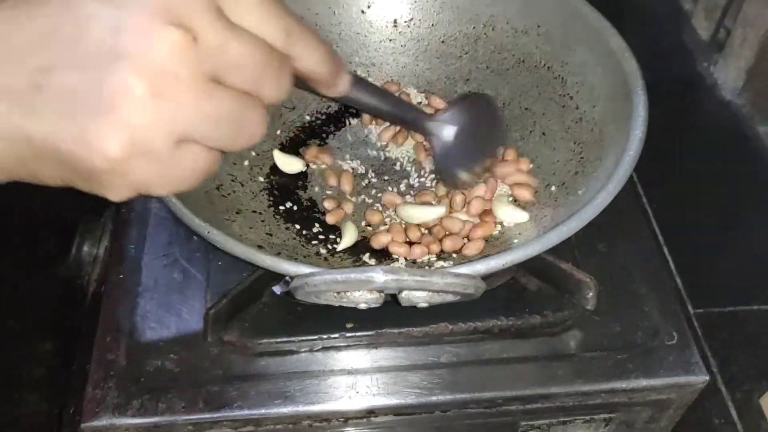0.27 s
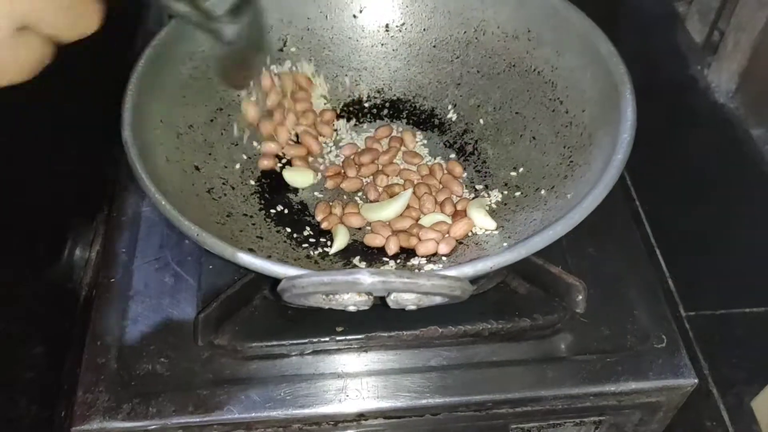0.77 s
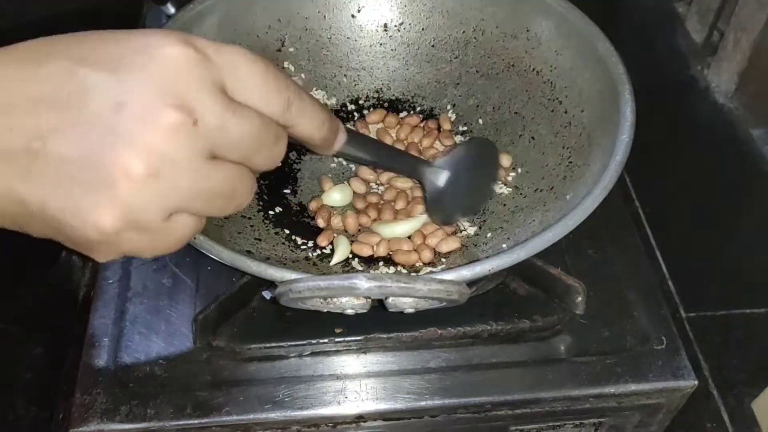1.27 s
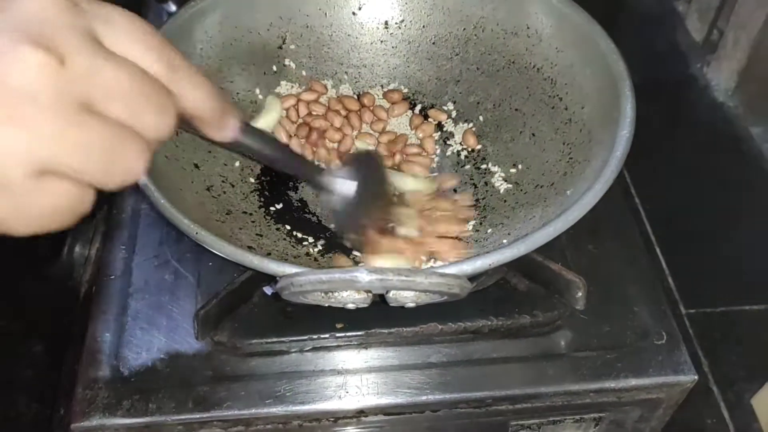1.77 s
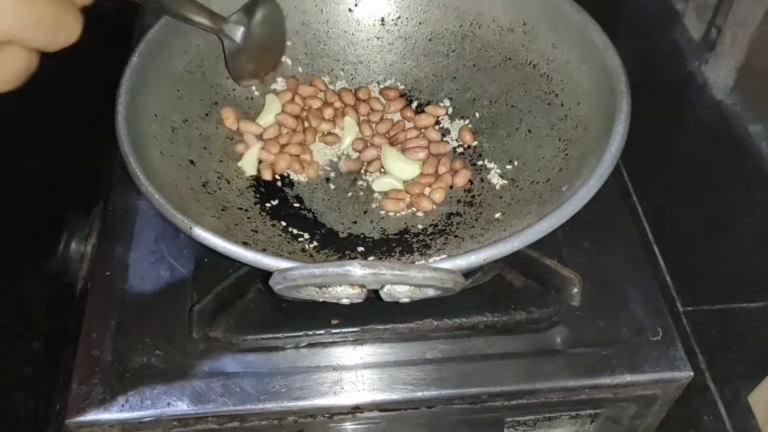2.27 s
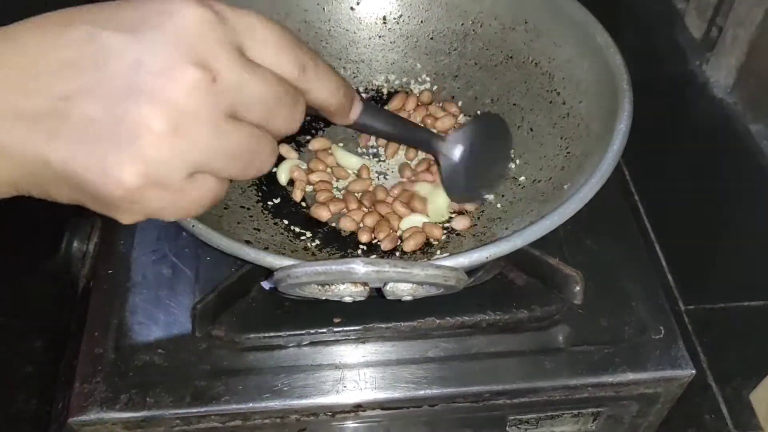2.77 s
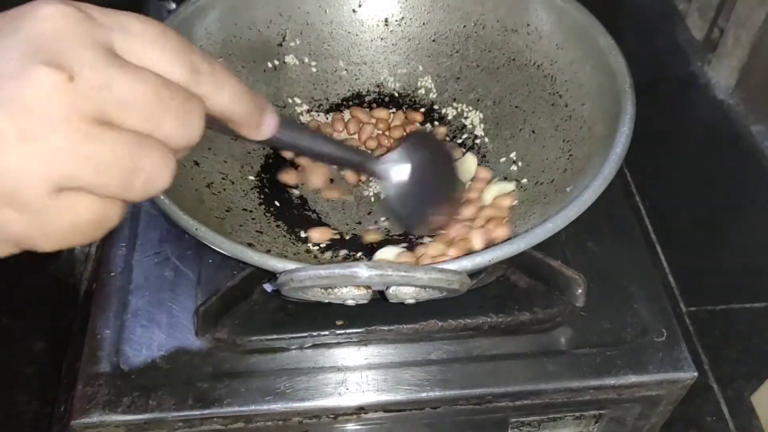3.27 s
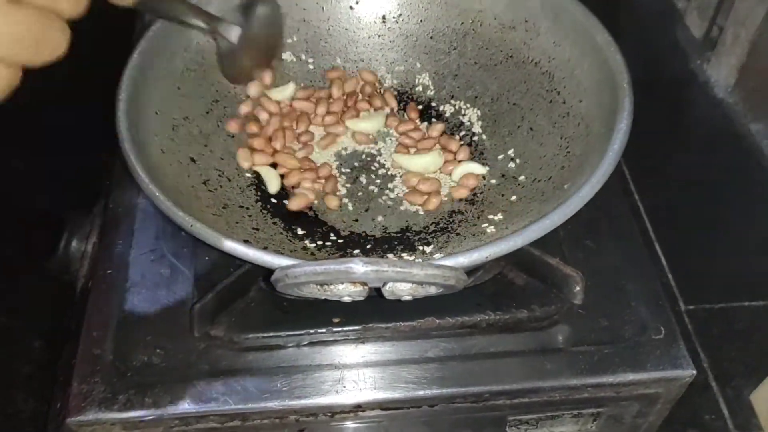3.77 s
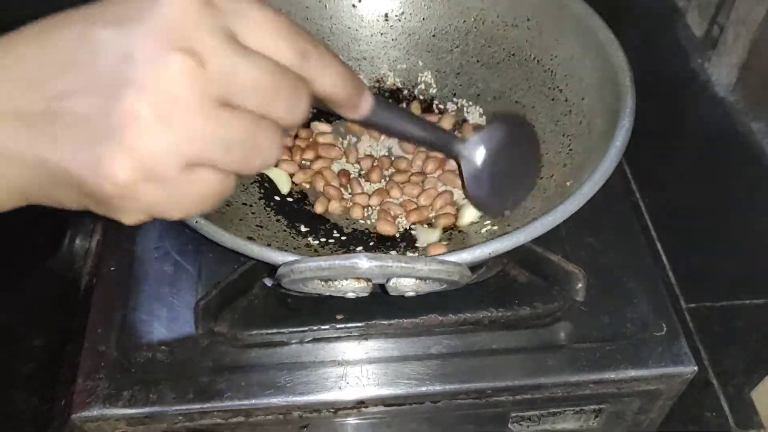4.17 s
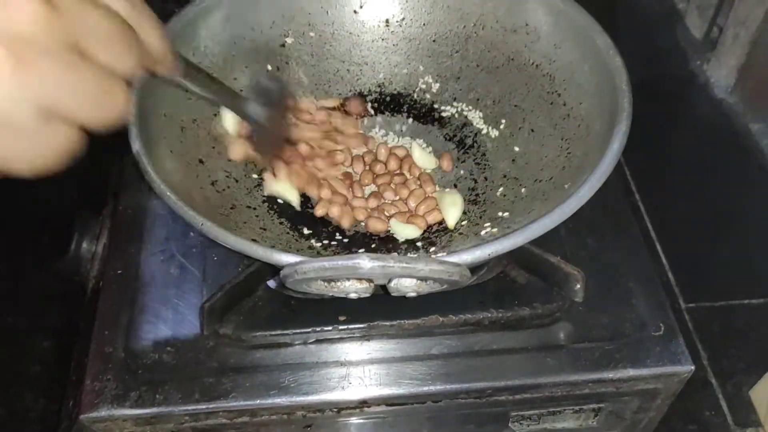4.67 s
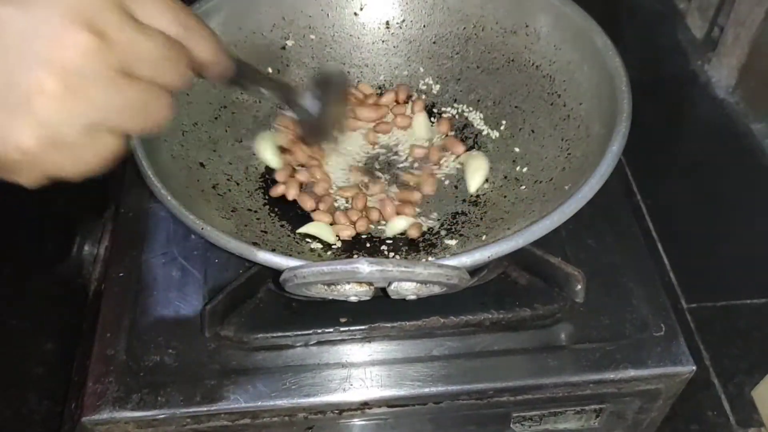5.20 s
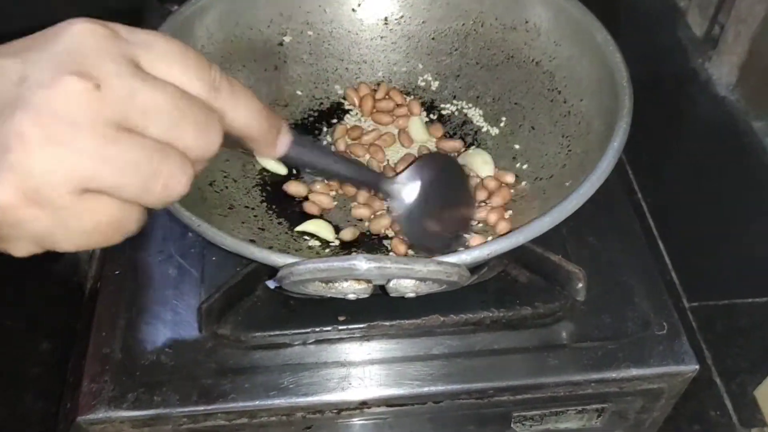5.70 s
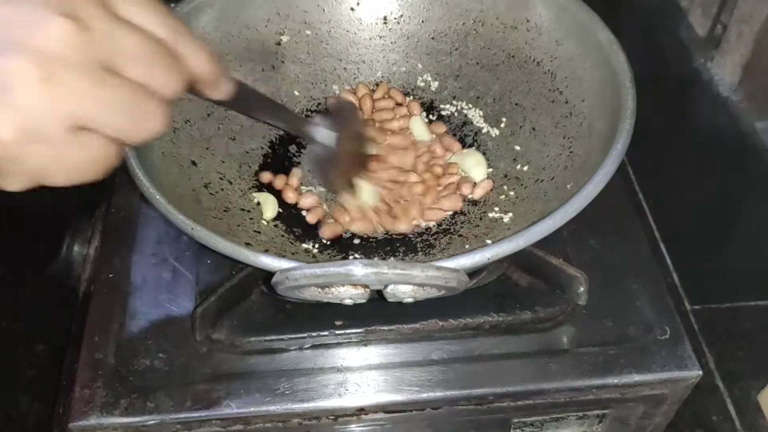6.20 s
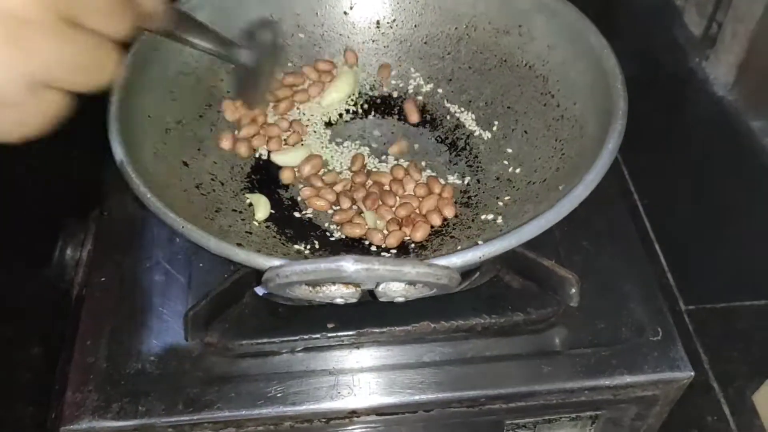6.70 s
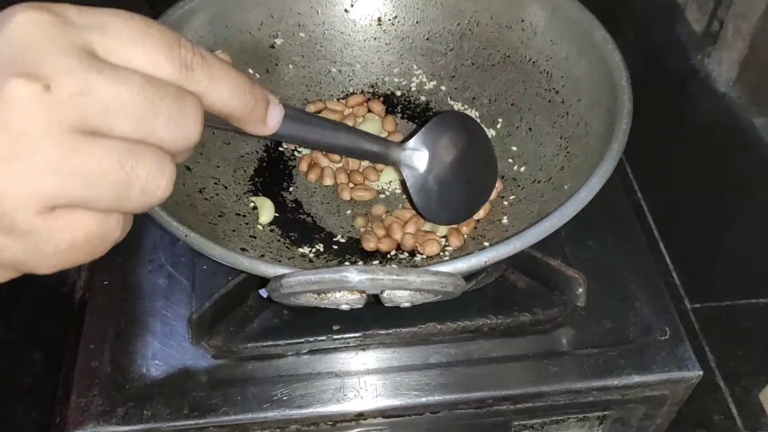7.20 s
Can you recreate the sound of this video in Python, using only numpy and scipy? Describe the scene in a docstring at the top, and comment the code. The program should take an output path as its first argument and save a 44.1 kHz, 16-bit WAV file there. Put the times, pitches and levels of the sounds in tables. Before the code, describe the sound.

Dry-roasting nuts are stirred briskly in a wide metal pan. The ladle edge lands with a hard, short clank, skids, pushes through crunchy food with a rasping swish, then lifts while loose pieces tumble. This repeats to the end, some blows loud enough to distort, others dull. Close stereo microphone, bright and slightly harsh, with hard room reflections, quiet burner hiss and faint low rumble.

```python
"""A steel ladle clanks onto a thin metal pan, close by, then drags through nuts, seeds and grit.
Landings and lighter knocks are short noise bursts ringing the modes of pan and ladle.
Pushes, skids and settling food are random clicks through those same modes, plus two moving resonances.
A hard kitchen answers with a tail of sparse taps; shaped noise makes the gas burner's hiss and the
house rumble, and two wavering sine tones hum underneath."""
import sys
import numpy as np
from scipy import signal
from scipy.io import wavfile
from scipy.ndimage import uniform_filter1d

SR = 44100
rng = np.random.default_rng(int(sys.argv[2]) if len(sys.argv) > 2 else 0)


def amp(db):
    return 10 ** (np.asarray(db, float) / 20)


def write(x):
    x = np.atleast_2d(x).T
    wavfile.write(sys.argv[1], SR, np.round(np.clip(x, -1, 1) * 32767).astype(np.int16))


N = 328545  # length in samples
LADLE_HZ = 3937  # the ladle's own clear note

# The ladle's edge lands on the pan. Each row: start in seconds, clank peak in dB, thud in dB re peak,
# ladle note before its fade in dB re peak, loudest patch in Hz, shimmer in dB re peak.
LANDINGS = [(0.0355, 1.5, -11.5, -2, 6130, -4), (0.4771, -5.5, -7.5, -34, 7250, -2),
            (0.845, 1, -14.5, -5.5, 6130, -2.5), (1.264, -10, -5.5, -36, 6900, -2),
            (1.683, -1, -16, -30, 8600, -1.5), (2.0573, -4.5, -4.5, -41, 7550, -3.5),
            (2.3586, -2, -11, 1.5, 8590, -3), (2.7287, -13.5, -0.5, -29, 6960, -3.5),
            (3.1692, -6, -12.5, -37, 6800, -3), (3.483, -5.5, -12.5, -38, 6870, -2.5),
            (3.8656, -22.5, -15, 8, 7350, -5.5), (4.2226, -13, -4.5, -33, 6760, -5),
            (4.6633, -14, -6, -19, 7450, -2), (4.6963, 1, -11.5, -27, 6350, -4.5),
            (5.0267, -12, -2, -14, 7560, -5), (5.3361, -23.5, -20, 12, 5980, -4),
            (5.7547, -2, -11, -34, 8400, -2), (6.0984, 2, -10, -10, 8600, -2.5),
            (6.5196, -5.5, -4, -41, 6930, -4), (6.8253, -28, 4, 14, 6710, -6),
            (6.9216, -2.5, -12.5, -18, 6900, -5), (7.374, -8, -4, -36, 8250, -2)]


def landings(pan):
    """Each stroke begins with a hard blow of the edge that rings pan and ladle."""
    shimmer_db = np.array(LANDINGS)[:, 5:]
    return strike(LANDINGS, -18, shimmer_db, 0.0022, *pan)


# Lighter knocks in mid stroke, probably nuts caught by the edge. Each row: start in seconds,
# clank peak in dB, thud in dB re peak, ladle note before its fade in dB re peak, loudest patch in Hz.
KNOCKS = [(0.3645, -27.5, -15, -25, 6890), (0.3955, -26, -9, -30, 6860), (0.5744, -10, -10, -10, 4810),
          (0.7401, -22, 0, 3, 7460), (0.7689, -17, -5, -0.5, 6080), (1.1313, -27.5, 0, -8, 6840),
          (1.1802, -32.5, 0, -33, 6870), (1.9919, -30, -2, -27, 7660), (2.23, -24.5, -28, -26.5, 6300),
          (2.4463, -18, -42, -23, 4680), (2.453, -13, -19, -13, 4580), (2.4596, -25, -30, -15, 8700),
          (2.827, -10.5, -24, -25, 6870), (2.8963, -22, -22, -13, 4840), (2.909, -8, -27, -18, 4830),
          (3.1123, -28, -17, 3, 6800), (3.2096, -8.5, -11.5, -18, 7470), (3.8232, -29, -4, 10, 7960),
          (4.339, -16, -11, -21, 6550), (4.3824, -6.5, -27, -18, 6700), (4.611, -36, -11, 10, 6900),
          (4.7864, -10, -18, -22, 4600), (5.1226, -14, -6.5, -22, 7120), (5.4131, -25, -5, -22, 8560),
          (5.738, -31, -25, -30, 11000), (6.4395, -38, -16, -24, 6860), (6.6238, -15, -9, 4, 6970),
          (6.847, -21, -11, -22, 7200), (7.002, -18, -5, -16, 7500)]


def knocks(pan):
    """Lighter, duller blows with less body and a shorter bounce."""
    return strike(KNOCKS, -33, -18, 0.0018, *pan)


def strike(rows, body_db, shimmer_db, bounce_s, hz, strength, waves):
    """Each blow rings another patch of metal; hand and food damp it; the edge bounces for a few ms."""
    patch_db, patch_hz = 6, 500
    damping_t60, thud_t60, note_t60 = 0.083, 0.024, 0.046  # seconds
    ladle_band_db, focus, note_rise_s = -15, 0.32, 0.0095
    thud_low_hz = 350  # a light, short blow hardly moves the lowest modes
    s, peak_db, thud_db, note_db, loud_hz = np.transpose(rows)[:5, :, None]
    t = np.arange(waves.shape[1]) / SR

    patch = amp(patch_db * np.exp(-((hz - loud_hz) / patch_hz) ** 2))
    gains = pair(hz, (len(s), len(hz))) * strength * patch
    gains += focus * strength * (hz < PARTS_HZ[0]) * -1j  # low modes start together: one sharp knock
    gains *= hz ** 2 / (hz ** 2 + thud_low_hz ** 2)

    chatter = rng.standard_normal((len(s), 600)) * np.exp(-t[:600] / bounce_s)
    damping = amp(-60 * t / damping_t60)
    parts = []
    for part in range(1, 5):
        ring = rings(hz, gains, waves, part) * damping
        parts.append(signal.fftconvolve(ring, chatter[None], axes=2)[..., :len(t)])
    thud = rings(hz, gains, waves, 0) * amp(-60 * t / thud_t60)
    parts.append(thud)  # the heavy body takes one push, without chatter

    clank = 0
    for ring, db in zip(parts, [body_db, ladle_band_db, 0, shimmer_db, thud_db]):
        mid_peak = abs(ring.mean(0)).max(1)[:, None]
        clank += ring / mid_peak * amp(peak_db + db)
    note = np.exp(2j * np.pi * (LADLE_HZ * t + rng.random((2, len(s), 1)))).real
    note_side_db = read(LEAN, LADLE_HZ) / np.array([[[2]], [[-2]]])
    note = note * amp(-60 * t / note_t60 + note_side_db) * np.minimum(t / note_rise_s, 1)
    clank += note * amp(peak_db + note_db)

    out = np.zeros((2, N + len(t)))
    for k, at in enumerate(np.round(s[:, 0] * SR).astype(int)):
        out[:, at:at + len(t)] += clank[:, k]
    return out[:, :N]


def drag(hz, strength, waves):
    """Seeds and burnt grit slip under the edge: random clicks ring a contact point that keeps moving."""
    points, grit_per_s, spread_db, move_s = 5, 1500, 4.5, 0.025
    squeal_db, squeal_width_hz = -6, 70
    hollow_db, hollow_width_hz = -9, 45
    crisp, path_spread_s = 0.14, 0.000536
    t = np.arange(N) / SR
    drag_db, weight_db, body_db, ring_db, shimmer_db, squeal_hz, hollow_hz = hand()

    slips = rng.random(N) < grit_per_s / SR
    grit = slips * amp(spread_db * np.minimum(rng.exponential(1, N), 4))
    grit *= rng.choice([-1., 1.], N)
    grit /= np.sqrt(np.mean(grit ** 2))
    even = np.sign(grit) * np.sqrt(abs(grit))  # the heavy body averages large and small slips
    even /= even.std()

    step = (t / move_s).astype(int)
    point = rng.integers(0, points, N // 200 + 1)[step]
    gains = pair(hz, (points, len(hz))) * strength
    # each slip also arrives as one crisp tick, by its own path to either side
    path_s = path_spread_s * rng.random((2, points, 1))
    tick = abs(pair(hz, (points, len(hz)))).mean(1, keepdims=True)
    gains += crisp * strength * tick * np.exp(-2j * np.pi * hz * path_s)

    out = np.zeros((2, N))
    for part, db in enumerate([weight_db, body_db, ring_db, 0, shimmer_db]):
        drive = (grit if part else even) * amp(drag_db + db)
        for k, ring in enumerate(rings(hz, gains, waves, part).transpose(1, 0, 2)):
            out += signal.oaconvolve((drive * (point == k))[None], ring, axes=1)[:, :N]

    # pressing bends the ladle's ring; the air under its bowl is a hollow that changes with tilt
    for db, curve, width in [(ring_db + squeal_db, squeal_hz, squeal_width_hz),
                             (weight_db + hollow_db, hollow_hz, hollow_width_hz)]:
        phases = np.angle(pair(curve.mean(), (N // 200 + 1, 1))[:, step, 0])
        sides = uniform_filter1d(np.exp(1j * phases), 400)
        lean = amp(read(LEAN, curve) / [[2], [-2]])
        out += (resonate(grit * amp(drag_db + db), curve, width) * sides * lean).real
    return out


# The edge is pushed through the food. Each row: strongest moment in seconds, rise in seconds,
# fall in seconds, drag in dB, weight on the pan in dB re drag, ladle ring in dB re drag,
# hollow under the bowl in Hz.
PUSHES = [(0.066, .03, 0.035, -20, -15.5, 11, 460), (0.115, .02, 0.034, -23, -13, -22, 436),
          (0.18, .06, 0.19, -35.5, -18, -11, 430), (0.52, 0.066, .05, -26, -5.5, -18, 600),
          (0.585, 0.062, 0.057, -23, -7, -8, 520), (0.645, 0.08, 0.063, -30.5, -3.5, -34, 296),
          (0.748, .01, .02, -35, 4, -7, 440), (0.776, .007, 0.047, -32, 3.5, -7, 420),
          (0.899, .03, 0.037, -20.5, -13.5, -4, 625), (1.056, 0.28, 0.12, -41, -14, -18, 385),
          (1.334, 0.064, 0.059, -23.5, -9.5, -21, 490), (1.47, 0.22, 0.12, -35.5, -16, -10.5, 370),
          (1.71, 0.02, 0.087, -25.5, -15.5, -8, 610), (1.88, .06, 0.18, -44, -5, -30, 370),
          (2.098, 0.097, 0.027, -21, -15, -6.5, 490), (2.234, .004, 0.038, -45, -6, -11, 380),
          (2.423, 0.038, 0.06, -27, -9, -2, 510), (2.573, 0.18, 0.076, -37.5, -18, -17, 406),
          (2.824, 0.097, 0.033, -24, -12, -26, 510), (2.895, 0.13, 0.064, -22, -9, -6, 550),
          (3.15, 0.17, 0.04, -38.5, -7.5, -16, 514), (3.21, 0.053, 0.072, -22, -16, -12, 510),
          (3.335, 0.06, 0.13, -41, -4, -13, 407), (3.51, 0.011, 0.13, -25.5, -12.5, -34, 530),
          (3.598, 0.087, 0.044, -20.5, -13.5, -9.5, 420), (3.7, .05, 0.27, -42, -4, -5, 447),
          (3.99, 0.11, 0.18, -32, -13, -10.5, 386), (4.369, 0.088, 0.1, -19.5, -13.5, -11.5, 520),
          (4.59, 0.059, 0.1, -38.5, -5, -10, 425), (4.678, 0.0089, .02, -30.5, 7, -12, 380),
          (4.729, 0.045, 0.077, -20, -6.5, -13, 330), (4.92, 0.18, 0.094, -38.5, -7, -12, 330),
          (5.129, 0.23, 0.058, -26, -10.5, -13, 490), (5.23, 0.14, 0.15, -35, -20, -9, 410),
          (5.345, 0.015, 0.094, -39, -1, 17, 330), (5.49, 0.16, 0.23, -32.5, -15, -14, 375),
          (5.811, 0.087, 0.061, -27.5, -10.5, 0.5, 496), (6.199, 0.044, 0.058, -22.5, -15, -7.5, 544),
          (6.31, .05, 0.093, -35, -15.5, -27, 330), (6.46, .05, 0.087, -44, 0, -19, 310),
          (6.577, 0.12, 0.084, -22.5, -9.5, -8, 510), (6.72, 0.08, 0.064, -36, -17.5, -11, 360),
          (6.85, 0.047, 0.073, -29, 2.5, -9, 351), (7.01, 0.15, 0.036, -28.5, -14.5, -5, 537),
          (7.402, 0.035, .06, -32, -4, -28, 480)]
# Skid after a landing. The row: level in dB re landing peak, fade in dB per second,
# weight on the pan in dB re drag, ladle ring in dB re drag.
SKID = (-14, 236, -10.5, -22.5)
# Food rolling to rest. The row: level in dB re the push or skid, fade in dB per second,
# weight on the pan in dB re drag, ladle ring in dB re drag.
SETTLE = (-12.5, 74.5, -11, -16)


def hand():
    """Skids, pushes and settling food add in power to the drag and share how it loads pan and ladle."""
    edge_db = 12  # how far a push is down one rise before and one fall after its peak
    brush_db, brush_db_per_s = -39.5, 505  # the edge brushes the food just before it lands
    body_phase_db, body_per_weight = (-10, -7, -9.5), 0.79  # while (pushing, skidding, settling)
    shimmer_phase_db = (-2, -0.5, -2)  # the same three phases
    hollow_phase_hz, hollow_wander_hz = (520, 360), 24.8  # while (skidding, settling)
    bend_hz, bend_wander_hz = 192, 69.6  # the ladle's ring is higher outside skids
    wander_db = 1.5
    skid_under_db, skid_fade, skid_weight_db, skid_ring_db = SKID
    settle_under_db, settle_fade, settle_weight_db, settle_ring_db = SETTLE

    t = np.arange(0, N, 32) / SR  # control rate: one point per 32 samples
    peak_s, rise, fall, push_db, weight, ring, hollow = np.transpose(PUSHES)[..., None]
    land_s, land_db, *_, bright = np.transpose(LANDINGS)[..., None]
    landed = (t >= land_s).sum(0)

    push = push_db - edge_db * ((t - peak_s) / np.where(t < peak_s, rise, fall)) ** 2
    push[landed < (peak_s >= land_s.T).sum(1)[:, None]] = -99  # no push before its stroke has landed
    held_db = bright[np.maximum(landed - 1, 0), 0]  # a stroke stays as bright as it landed
    after = land_db + skid_under_db - skid_fade * (t - land_s)
    before = brush_db - brush_db_per_s * (land_s - t)
    skid = np.max(np.where(t >= land_s, after, before), 0)
    # settling follows the loudest motion up at once and fades at a steady rate
    moving = np.maximum(push.max(0), skid)
    settle = np.maximum.accumulate(moving + settle_fade * t) - settle_fade * t + settle_under_db

    power = amp(2 * np.vstack([push, skid, settle]))
    drag_db = 10 * np.log10(power.sum(0))
    share = power / power.sum(0)
    phase = np.vstack([share[:-2].sum(0), share[-2:]])  # pushing, skidding, settling
    weight_db = np.append(weight, [skid_weight_db, settle_weight_db]) @ share
    ring_db = np.append(ring, [skid_ring_db, settle_ring_db]) @ share
    a, b, c, d, e, f = wander(count=6, size=len(t))
    body_db = body_phase_db @ phase + body_per_weight * weight_db + wander_db * b
    shimmer_db = held_db + shimmer_phase_db @ phase + wander_db * d
    squeal_hz = LADLE_HZ + bend_hz * (1 - phase[1]) + bend_wander_hz * e
    hollow_hz = np.append(hollow, hollow_phase_hz) @ share + hollow_wander_hz * f
    controls = [drag_db, weight_db + wander_db * a, body_db, ring_db + wander_db * c,
                shimmer_db, squeal_hz, np.maximum(hollow_hz, 200)]
    return [np.interp(np.arange(N) / SR, t, curve) for curve in controls]


def wander(count, size):
    """Slow chance curves of unit size: twice-smoothed noise at the control rate."""
    width = round(0.045 * SR / 32)  # 45 ms
    x = uniform_filter1d(uniform_filter1d(rng.standard_normal((count, size)), width), width)
    return x / x.std()


def resonate(x, hz, width):
    """A steep moving resonance: shift hz down to zero, smooth twice, shift back; complex, unit power."""
    turn = np.exp(2j * np.pi * np.cumsum(hz) / SR)
    r = np.exp(-np.pi * width / SR)
    unit_power = np.sqrt(2 * (1 - r ** 2) ** 3 / (1 + r ** 2))
    return turn * signal.lfilter([unit_power], [1, -2 * r, r ** 2], x / turn)


# The clear modes of pan and ladle. Each row: frequency in Hz, width in Hz,
# relative strength in dB before the common lift.
CLEAR = [(522, 160, -12), (627.4, 19, -3.5), (797, 19, -6.5), (1435, 20.6, -9.5), (1699, 250, -19.5),
         (3900, 190, -7), (4700, 260, 1), (6100, 30, -27), (6130, 83, -21), (6300, 45, 3), (6870, 52, 9),
         (7460, 150, -3), (8590, 70, 5.5), (9100, 12, 8), (9400, 110, -5.5), (10260, 210, 2.5)]
# Strength of the dense modes. Each row: frequency in Hz, relative strength in dB.
METAL = [(88, -43), (150, -14.5), (201, -17.5), (297, -5.5), (376, -15), (484, -4.5), (689, -14), (805, 1),
         (1210, -18.5), (2600, -20.5), (3420, -22), (4000, -1), (7040, 5), (10800, 2), (16000, -13)]
# Ring time of the dense modes before any damping by hand and food. Each row: frequency in Hz,
# t60 in seconds.
RING = [(200, 0.33), (800, 0.041), (2000, 0.093), (4000, 0.2), (8000, 0.075), (16000, 0.095)]


def metal():
    """Thin metal has many close modes and a few clear ones: frequencies, strengths, dying waves."""
    count, size = 1000, 5000  # dense modes, samples of ring
    swing_cycles, clear_lift_db = 0.33, 2
    dense = 110 + 16000 * ((np.arange(count) + rng.random(count)) / count) ** 1.5
    clear, width, clear_db = np.transpose(CLEAR)
    hz = np.append(dense, clear)
    spacing = np.gradient(np.sort(dense))
    t60 = np.append(read(RING, dense), np.clip(2.9 / width, .02, .3))  # a narrow mode rings longer
    dense_energy = amp(read(METAL, dense)) ** 2 * spacing
    clear_energy = amp(clear_db + clear_lift_db) ** 2 * width
    energy = np.append(dense_energy, clear_energy)
    t = np.arange(size) / SR
    waves = np.exp((2j * np.pi * hz[:, None] - np.log(1000) / t60[:, None]) * t)
    waves[:, :400] *= 1 - np.exp(-hz[:, None] * t[:400] / swing_cycles)  # a mode needs time to swing up
    return hz, np.sqrt(energy / t60), waves.astype(np.complex64)


# Borders between thud, body, ladle ring, clank and shimmer. Each entry: frequency in Hz.
PARTS_HZ = [1200, 3600, 4300, 9000]


def rings(hz, strength, waves, part):
    """One part of the metal rung at each contact point: channels x points x samples, unit mid energy."""
    inside = np.searchsorted(PARTS_HZ, hz) == part
    sound = (strength[..., inside].astype(np.complex64) @ waves[inside]).real
    return sound / np.linalg.norm(sound.mean(0), axis=1)[:, None]


# Likeness of left and right. Each row: frequency in Hz, correlation from -1 to 1.
SAME = [(60, 0.99), (180, 1), (550, 0.9), (1650, -0.1), (4970, 0.19), (15000, -0.13)]
# Balance of the sides. Each row: frequency in Hz, left over right in dB.
LEAN = [(60, 5.5), (150, -1), (380, 0.5), (950, 3), (2380, 0.5), (5980, 8), (15000, 1)]


def pair(hz, shape):
    """Random complex gains at two microphones: alike in the bass, nearly unrelated in the treble."""
    a, b, c, d = rng.standard_normal((*shape, 4)).transpose(2, 0, 1)
    same = np.clip(read(SAME, hz), -1, 1)
    left = a + 1j * b
    right = same * left + np.sqrt(1 - same ** 2) * (c + 1j * d)
    lean = amp(read(LEAN, hz) / 2)
    return np.array([left * lean, right / lean])


def read(points, hz):
    """A tabled curve at the frequencies hz, joined along a log frequency axis."""
    f, value = np.transpose(points)
    return np.interp(np.log(hz + 1), np.log(f + 1), value)


# How long the room rings. Each row: frequency in Hz, t60 in seconds.
KITCHEN = [(200, 0.057), (1000, 0.92), (4000, 0.81), (9000, 0.47), (16000, 1)]


def kitchen(x):
    """Hard walls answer with sparse taps of random sign, each band dying at its own speed."""
    taps = np.zeros((2, SR))
    at = np.arange(200, SR - 20, 20) + rng.integers(0, 20, (2, (SR - 201) // 20))
    np.put_along_axis(taps, at, rng.choice([-1., 1.], at.shape), 1)
    hz, t, z = signal.stft(taps, SR, nperseg=256)
    fade = amp(-60 * t / read(KITCHEN, hz)[:, None])
    tail = signal.istft(z * fade, SR, nperseg=256)[1]
    return amp(-15.5) * signal.fftconvolve(x, tail / np.linalg.norm(tail[0]), axes=1)[:, :N]


# Colour of burner hiss and house rumble. Each row: frequency in Hz, relative level in dB per Hz.
AIR = [(24, -41), (40, -6.5), (118, -6), (199, -16), (312, -4.5), (433, -17.5), (810, -12.5), (1950, -31),
       (3740, -28.5), (4680, -17), (5720, -24), (8340, -13.5), (16000, -34.5)]


def air():
    """Burner hiss and house rumble: random short-time spectra in drifting patches."""
    level_db, patchy_db = -41, 4.0
    frames, hz = N // 512 + 5, np.fft.rfftfreq(2048, 1 / SR)
    patches = uniform_filter1d(rng.standard_normal((frames, len(hz))), 8, 0)  # smooth in time
    patches = uniform_filter1d(patches, 12, 1)  # smooth in frequency
    colour = amp(read(AIR, hz) + patchy_db * patches / patches.std())
    z = pair(hz, (frames, len(hz))) * colour
    x = signal.istft(z.transpose(0, 2, 1), nperseg=2048, noverlap=1536)[1][:, :N]
    return amp(level_db) * x / x.std()


# Pitches of the two hums, upper then lower. Each entry: frequency in Hz.
HUM_HZ = [120, 30.1]
# Their changing levels. Each row: time in seconds, upper hum in dB rms, lower hum in dB rms.
HUM = [(0.0, -61, -53.5), (0.64, -50.5, -44), (0.72, -55, -49), (0.79, -58, -40), (1.2, -51.5, -51),
       (1.33, -55.5, -43), (2.63, -57.5, -54.5), (2.78, -56, -41.5), (3.86, -60, -56), (3.96, -55, -42),
       (4.25, -68, -54), (4.29, -53.5, -46), (4.94, -56.5, -47), (6.1, -54, -51.5), (6.16, -54.5, -47),
       (6.87, -44.5, -51), (7.22, -54.5, -44), (7.45, -47, -45)]


def hum():
    """Faint low sine tones with unsteady pitch and level."""
    waver, lag_rad = 3.58, 0.067  # noise factor before smoothing, phase lead of the right side
    s, *levels = np.transpose(HUM)
    out = 0
    for hz, db in zip(HUM_HZ, levels):
        pitch = hz * (1 + waver * uniform_filter1d(rng.standard_normal(N), 4000))
        level = np.sqrt(2) * amp(np.interp(np.arange(N) / SR, s, db))
        out += level * np.sin(2 * np.pi * np.cumsum(pitch) / SR + [[0], [lag_rad]])
    return out


def scene():
    """Strokes, landings and knocks on one pan, in one room."""
    pan = metal()
    near = landings(pan) + knocks(pan) + drag(*pan)
    return near + kitchen(near) + air() + hum()


def top_cut(x):
    """Nothing passes above the cut-off."""
    return signal.sosfilt(signal.butter(12, 16460, fs=SR, output="sos"), x)


def record(dry):
    """The loudest landings clip at full scale."""
    mix = np.clip(dry, -1, 1)
    return top_cut(mix)


dry = scene()
out = record(dry)
write(out)
```